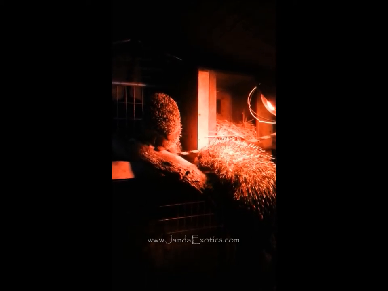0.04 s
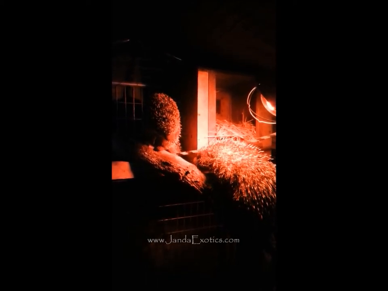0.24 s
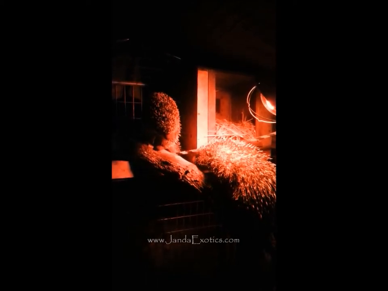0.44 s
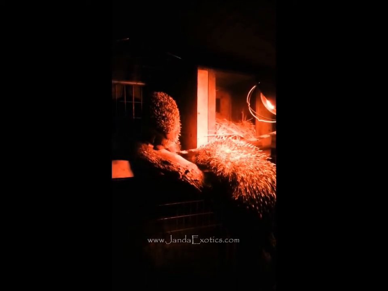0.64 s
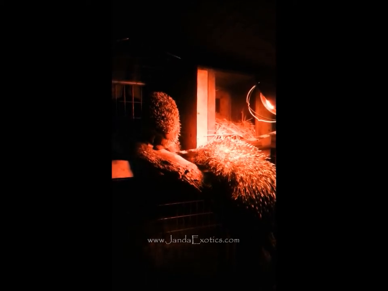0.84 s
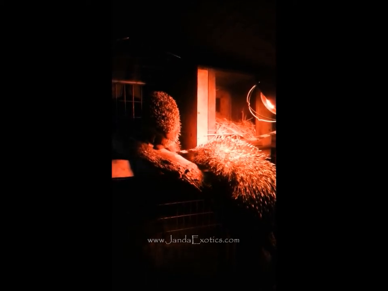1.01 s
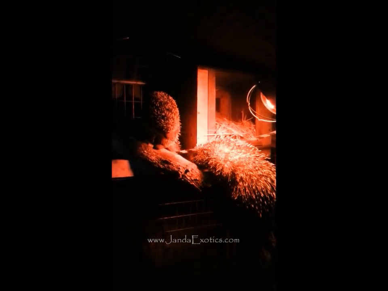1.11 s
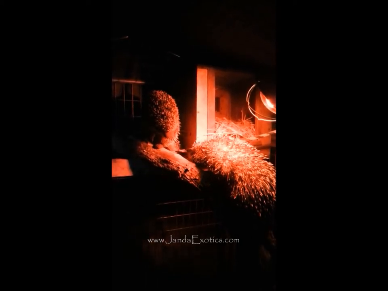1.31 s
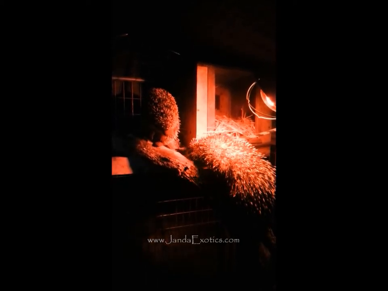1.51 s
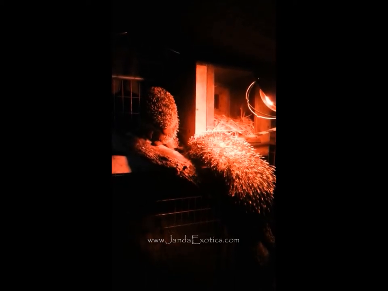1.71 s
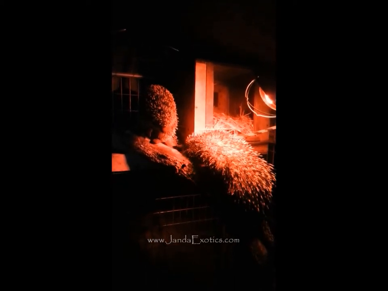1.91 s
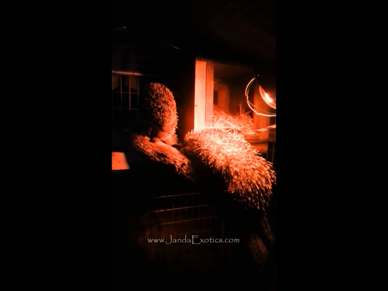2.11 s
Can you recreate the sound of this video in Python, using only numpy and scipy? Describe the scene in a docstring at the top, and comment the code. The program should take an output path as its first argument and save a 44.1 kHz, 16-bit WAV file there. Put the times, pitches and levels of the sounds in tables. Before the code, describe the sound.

A porcupine lets out two very short, harsh shrieks, then a whimpering growl and hissing snarl. After a pause comes a falling squawk and a low grunt. Quills and bedding rustle faintly, close up in a small wooden enclosure.

```python
"""Porcupine protesting in a wooden enclosure

Close up, on a stereo pair: two harsh shrieks, a whimpering growl, a hissing snarl, a falling squawk
and low grunts. Each is a train of uneven throat pulses ringing the mouth's resonances, with air
hissing past the teeth; the whimper is a thin wavering tone. Quills and bedding rustle and tick over
a faint low rumble, and the boards of the small enclosure throw everything back."""
import sys
import numpy as np
from scipy import signal
from scipy.fft import rfft, irfft
from scipy.io import wavfile
from scipy.ndimage import uniform_filter1d, minimum_filter1d

SR = 44100
rng = np.random.default_rng(int(sys.argv[2]) if len(sys.argv) > 2 else 0)


def put_to_file(sound):
    """Save the sound as 16-bit audio at rate SR, in the file named by the first command-line argument."""
    columns = np.atleast_2d(sound).T  # one column per channel
    safe = np.clip(columns, -1, 1)
    whole_steps = np.round(safe * 32767)
    wavfile.write(sys.argv[1], SR, whole_steps.astype(np.int16))


N = 94815
TIME = np.arange(N) / SR
FFT_SIZE = 2 ** 17
HZ = np.maximum(np.arange(FFT_SIZE // 2 + 1) * SR / FFT_SIZE, 1)
ALIKE = 1 / (1 + (HZ / 380) ** 2)   # share of diffuse power common to both microphones: the bass


def from_db(db):
    """Decibels to gain."""
    return 10 ** (np.asarray(db) / 20)


def rms_one(x):
    """Scale to unit power."""
    return x / np.sqrt(np.mean(x ** 2) + 1e-20)


def colour(points):
    """Gain at each frequency from (Hz, dB) points."""
    hz, db = np.transpose(points)
    return from_db(np.interp(np.log(HZ), np.log(hz), db))


def resonances(rows, skirt=1.189):
    """Unit-power gain curve of (centre Hz, width Hz, relative dB) peaks; skirt steepens their flanks."""
    return rms_one(sum(from_db(db) / (1 + (2 * (HZ - hz) / width) ** 2) ** skirt
                       for hz, width, db in rows))


def filtered(x, gain):
    """Causal (minimum-phase) filter with the given gains."""
    cepstrum = irfft(np.log(gain + 1e-9))
    cepstrum[1:FFT_SIZE // 2] *= 2
    cepstrum[FFT_SIZE // 2 + 1:] = 0
    return irfft(rfft(x, FFT_SIZE) * np.exp(rfft(cepstrum, FFT_SIZE)))[..., :N]


def in_time(rows):
    """A gate over the rows' span, then each column after the time at every sample."""
    times, *columns = np.transpose(rows)
    gate = uniform_filter1d(((TIME >= times[0]) & (TIME <= times[-1])) * 1., size=40)
    return [gate] + [np.interp(TIME, times, column) for column in columns]


def background(floor_db=-67, hum_hz=125, hum_db=-71.5):
    """Low rumble, alike at both microphones, with thin hiss and a faint hum."""
    # Room tone. Each row: frequency in Hz, relative level in dB.
    room_tone = [(25, -15), (60, -4), (115, 0), (170, -6), (300, -4.5), (600, -13.5), (3300, -30.5),
                 (7500, -30.5), (14500, -25.5)]
    gain = rms_one(colour(room_tone))
    common = filtered(rng.standard_normal(N), gain * np.sqrt(ALIKE))
    apart = filtered(rng.standard_normal((2, N)), gain * np.sqrt(1 - ALIKE))
    hum = rms_one(np.sin(2 * np.pi * hum_hz * TIME))
    return from_db(floor_db) * (common + apart) + from_db(hum_db) * hum


def enclosure(x, tail_delay_s=0.0042, early_decay_s=0.0028, early_db=-0.5):
    """Close reflections off the boards, then a short tail that lasts longest in the bass."""
    # Bands of the tail. Each row: centre in Hz, reverberation time in seconds, level in dB.
    bands = [(80.2, 0.5, 1.5), (231.2, 0.45, -1), (810, 0.27, -9), (2100, 0.28, -4.5), (3160, 0.18, -8),
             (6950, 0.22, -7.5), (12930, 0.31, -2)]
    common = np.sqrt(ALIKE) * rfft(rng.standard_normal(FFT_SIZE))
    apart = np.sqrt(1 - ALIKE) * rfft(rng.standard_normal((2, FFT_SIZE)))
    log_centres = np.log([row[0] for row in bands])
    tail = 0
    for (_, t60, db), this_band in zip(bands, np.eye(len(bands))):
        noise = irfft((common + apart) * np.interp(np.log(HZ), log_centres, this_band))[:, :N]
        decay = from_db(-60 * TIME / t60) * (TIME > tail_delay_s)
        tail = tail + noise * from_db(db) * rms_one(decay)
    early = rng.standard_normal((2, N)) * rms_one(np.exp(-np.minimum(TIME / early_decay_s, 50)))
    response = (tail + from_db(early_db) * early) / np.sqrt(N)
    return signal.fftconvolve(x, response, axes=1)[:, :N]


def scattered(x, delays, feedback=.5):
    """Nearby boards smear each pulse over a few milliseconds (a chain of all-pass echoes)."""
    spectrum = rfft(x, FFT_SIZE)
    for delay in delays:
        echo = np.exp(-2j * np.pi * HZ * delay)
        spectrum = spectrum * (echo - feedback) / (1 - feedback * echo)
    return irfft(spectrum)[:N]


def at_microphones(x, lean):
    """The voice favours the left microphone, except around 7-9 kHz; a lean of 0 centres it."""
    # Balance at a lean of 1. Each row: frequency in Hz, left minus right in dB.
    balance = [(100, 3), (700, 4.5), (1400, 7.5), (2500, 5), (4000, 21.5), (5400, 8.5), (6900, -13.5),
               (9000, -9), (14000, 7.5)]
    # Echoes off the boards, left then right. Each row: two delays in seconds.
    board_delays = [(.00017, .00061), (.00021, .00054)]
    ratio = colour(balance) ** lean
    right = np.sqrt(2 / (1 + ratio ** 2))
    return np.array([scattered(filtered(x, gain), delays)
                     for gain, delays in zip((ratio * right, right), board_delays)])


def rustle(crackles_per_s=2100, crackle_db=-14):
    """Quills brush the bedding: soft friction with tiny crackles."""
    # The animal's stirring. Each row: time in seconds, level in dB.
    stirring = [(0, -50), (.03, -54.5), (.08, -68), (.16, -78), (.47, -66), (.56, -70), (.61, -51),
                (.72, -46.5), (.77, -59.5), (.93, -51.5), (1.0, -84), (1.27, -70), (1.45, -80),
                (1.74, -75.5), (1.8, -59.5), (1.96, -52.5), (2.02, -72.5), (2.15, -65)]
    # Tone of the bedding. Each row: frequency in Hz, relative level in dB.
    bedding = [(100, -2), (500, 3.5), (1000, -1.5), (2200, 1), (3200, 0.5), (5500, 1.5), (7500, 0.5),
               (10000, -2.5), (14500, -15.5)]
    _, db = in_time(stirring)
    crackles = (rng.random((2, N)) < crackles_per_s / SR) * rng.standard_normal((2, N))
    friction = rms_one(rng.standard_normal((2, N)) + from_db(crackle_db) * rms_one(crackles))
    return filtered(friction * from_db(db), rms_one(colour(bedding)))


def ticks(rise_s=0.002, decay_s=0.005, width_hz=4300):
    """Quills and claws make brief bright scratches, each with a slight knock on the boards."""
    # Each row: peak time in seconds, level in dB, brightest frequency in Hz, knock gain in dB.
    scratches = [(0.106, -57.5, 7600, -28), (1.288, -52, 7500, -4.5), (1.297, -50, 7600, 2),
                 (1.379, -56, 5800, -21), (1.525, -59.5, 8000, -5), (1.789, -48, 9100, -10),
                 (2.106, -47, 6700, -20)]
    # Tone of the knock. Each row: frequency in Hz, relative level in dB.
    knock = [(40, -2.5), (95, 23), (300, 9), (520, 18.5), (900, 1.5), (5000, 1), (11000, -6.5),
             (15000, -12)]
    out = np.zeros((2, N))
    for peak_s, db, hz, knock_db in scratches:
        envelope = np.exp(-np.maximum((peak_s - TIME) / rise_s, (TIME - peak_s) / decay_s).clip(0, 50))
        gain = resonances([(hz, width_hz, 0)]) + from_db(knock_db) * colour(knock)
        out += filtered(from_db(db) * envelope * rng.standard_normal((2, N)), gain)
    return out


def hiss(rows, rush_db, whistle_db, whistle_width_hz=500):
    """Air rushes through the mouth and excites a gliding whistle-like resonance at the teeth."""
    # Mouth resonances. Each row: centre in Hz, width in Hz, relative level in dB.
    mouth = [(3750, 820, -9.5), (5380, 980, -2.5), (6740, 2700, -8.5)]
    gate, db, hz = in_time(rows)
    rush = filtered(rng.standard_normal(N), resonances(mouth))
    pole = np.exp(-2 * np.pi * whistle_width_hz / SR)
    carrier = np.exp(2j * np.pi * np.cumsum(hz) / SR)
    slow_noise = signal.lfilter([1], np.poly([pole, pole]), rng.standard_normal(N) / carrier)
    whistle = rms_one((slow_noise * carrier).real)
    return gate * from_db(db) * (from_db(rush_db) * rush + from_db(whistle_db) * whistle)


def breaths():
    """Three hisses: with the second shriek, with the snarl and trailing the squawk."""
    # Each row: time in seconds, level in dB before the rush and whistle gains, whistle pitch in Hz.
    shriek_air = [(.575, -56, 6130), (.61, -47, 7194), (.68, -42.5, 5360), (.735, -39.5, 7160),
                  (.755, -60.5, 7200)]
    snarl_air = [(.81, -50, 6400), (.826, -38, 6360), (.85, -40, 6960), (.885, -46.5, 7140),
                 (.91, -53, 7100), (.945, -60, 8200), (.975, -87, 8610)]
    squawk_air = [(1.72, -48, 7000), (1.785, -44.5, 6860), (1.81, -52.5, 6730), (1.89, -49.5, 6600),
                  (1.912, -49, 6800), (1.972, -47.5, 7000), (2.01, -87, 7240)]
    return (hiss(shriek_air, rush_db=0.5, whistle_db=-5.5)
            + hiss(snarl_air, rush_db=-8, whistle_db=-1)
            + hiss(squawk_air, rush_db=0, whistle_db=-2.5))


def throat(start_s, end_s, pitch, rough):
    """Pulses with puffs of air; roughness makes them uneven, strong and weak by turns, and airier."""
    jitter, shimmer_db, limp, rough_air = 0.13, 1.5, 0.29, 0.97   # at full roughness
    leak = .14   # air even in the clearest voice
    pulses, puffs = np.zeros(N), np.zeros(N)
    now = start_s
    for k, (timing_draw, strength_draw) in enumerate(rng.standard_normal((400, 2))):
        if now >= end_s:
            break
        i = int(now * SR)
        period = np.exp(jitter * rough[i] * timing_draw) / pitch[i]
        alternation = 1 + limp * rough[i] * (-1) ** k / 2
        strength = from_db(shimmer_db * rough[i] * strength_draw) * alternation
        length = int(period * SR)
        pulses[i] = strength * np.sqrt(length)
        puffs[i:i + length] = strength * rms_one(np.exp(-1.5 * np.arange(length) / length))
        now += period
    air = np.clip(leak + rough_air * rough, 0, 1)
    source = np.sqrt(1 - air ** 2) * pulses + air * puffs * rng.standard_normal(N)
    local_power = np.maximum(uniform_filter1d(puffs ** 2, size=600), .1)
    return source / np.sqrt(local_power)


def call(contour, mouth, chest_db, chest_follows=0.31):
    """Throat pulses ring the mouth; the chest rumbles along, following part of the swing in dB."""
    # Tone of the chest. Each row: frequency in Hz, relative level in dB.
    chest_tone = [(30, -24), (80, 1.5), (130, -4.5), (220, -3.5), (400, -13), (700, -25), (3000, -59.5)]
    gate, pitch, db, rough = in_time(contour)
    source = throat(contour[0][0], contour[-1][0], pitch, rough) * gate * from_db(db)
    rumble = gate * from_db(chest_db + chest_follows * db) * rng.standard_normal(N)
    return filtered(source, resonances(mouth)) + filtered(rumble, rms_one(colour(chest_tone)))


def grunts():
    """Slow, soft throat pulses: one low grunt at the start and one after the squawk."""
    # One list a grunt. Each row: time in seconds, pitch in Hz, level in dB, roughness from 0 to 1.
    contours = [
        [(0, 166.2, -49, 0.34), (.025, 167, -50, 0.55), (.06, 154.3, -70, 0.54)],
        [(1.815, 176, -56, 0.51), (1.84, 184.8, -43, .1), (1.865, 185.9, -37.5, 0.11),
         (1.89, 168.7, -48.5, 0.55), (1.935, 133.3, -58, .9), (1.97, 153, -49.5, 0.84), (2.0, 130, -74, 0.59)],
    ]
    # Mouth resonances. Each row: centre in Hz, width in Hz, relative level in dB.
    mouth = [(170, 130, -5), (730, 220, -10), (1350, 350, -8), (2400, 700, -16), (3530, 280, 0),
             (3930, 420, 1), (5230, 450, -3.5), (7397, 600, -8)]
    return sum(call(contour, mouth, chest_db=-43) for contour in contours)


def whimper(waver_depth=.025):
    """A thin, nearly pure note that wavers above the growl."""
    # Each row: time in seconds, pitch in Hz, level in dB.
    contour = [(.736, 790, -53), (.748, 770, -45), (.775, 745, -47.5), (.79, 780, -44), (.808, 745, -50)]
    gate, hz, db = in_time(contour)
    waver = rms_one(uniform_filter1d(rng.standard_normal(N), size=120))
    phase = 2 * np.pi * np.cumsum(hz * (1 + waver_depth * waver)) / SR
    return gate * from_db(db) * rms_one(np.sin(phase))


def growl():
    """A short, half-rough pulse train holding near 250 Hz."""
    # Each row: time in seconds, pitch in Hz, level in dB, roughness from 0 to 1.
    contour = [(.742, 250, -48, .4), (.758, 252, -39.5, .35), (.792, 256, -34.5, .45), (.812, 245, -42, .6)]
    # Mouth resonances. Each row: centre in Hz, width in Hz, relative level in dB.
    mouth = [(1390, 1800, -1), (3550, 350, 12.5), (3960, 200, 18), (4970, 1100, -1), (7300, 930, -6)]
    return call(contour, mouth, chest_db=-43.5)


def snarl():
    """Low, rough pulses that slow as they fade."""
    # Each row: time in seconds, pitch in Hz, level in dB, roughness from 0 to 1.
    contour = [(.805, 200.8, -39.5, 0.85), (.83, 188.5, -37, 0.54), (.865, 174.5, -46.5, 0.32),
               (.93, 174.8, -47.5, 0.52), (.968, 146.8, -64, 0.45)]
    # Mouth resonances. Each row: centre in Hz, width in Hz, relative level in dB.
    mouth = [(190, 180, -13), (570, 400, -7), (1450, 700, -15), (2130, 990, -12.5), (3510, 230, 4),
             (3940, 380, 3), (5270, 530, -4)]
    return call(contour, mouth, chest_db=-49.5)


def squawk():
    """A clear note that falls and breaks into a rasp as the pulses turn uneven."""
    # Each row: time in seconds, pitch in Hz, level in dB, roughness from 0 to 1.
    contour = [(1.670, 415, -38, .25), (1.674, 420, -26, .2), (1.681, 405, -26, .08),
               (1.697, 404, -22.5, .05), (1.706, 390, -22, .07), (1.714, 366, -25.5, .13),
               (1.723, 340, -28, .42), (1.737, 305, -30, .55), (1.748, 237, -39, .75), (1.79, 182, -60, 1)]
    # Mouth resonances. Each row: centre in Hz, width in Hz, relative level in dB.
    mouth = [(380, 280, -32), (756, 460, -15.5), (1417, 250, -10.5), (2500, 1300, -17), (3490, 273, 2.5),
             (3920, 500, 2), (4410, 400, -17.5), (5270, 350, -5), (6900, 600, -14)]
    return call(contour, mouth, chest_db=-46)


def shrieks():
    """Two loud bursts of rough, airy pulses, plunging in pitch and ringing the mouth at 3-4 kHz."""
    # Each row: time in seconds, pitch in Hz, level in dB, roughness from 0 to 1.
    first = [(.2385, 448, -31.5, 0.92), (.2405, 427.8, -1, 0.88), (.247, 401, -12.5, 0.76),
             (.259, 325.9, -10.5, 0.9), (.265, 283, -6, 0.9), (.272, 247.7, -12.5, 0.64),
             (.279, 211, -40, 0.3)]
    second = [(.623, 399.4, -44.5, 0.88), (.627, 399, -19.5, 0.97), (.635, 340.7, -5.5, 0.51),
              (.643, 326, -13, 0.43), (.650, 239.3, -16.5, 0.89), (.662, 226.5, -42.5, 0.63),
              (.69, 228, -41, 0.6), (.735, 247, -51, 0.41)]
    # Mouth resonances. Each row: centre in Hz, width in Hz, relative level in dB.
    first_mouth = [(800, 450, -17.5), (1500, 720, -16), (3350, 500, 4.5), (3820, 600, 6.5),
                   (5320, 800, 1.5), (7095, 1710, -4.5), (9090, 500, -23)]
    second_mouth = [(690, 160, -18.5), (1320, 450, -15), (2100, 600, -21.5), (3200, 450, 2),
                    (3900, 600, -.5), (4700, 750, -2.5), (6450, 1700, -7.5), (10000, 2000, -32)]
    return call(first, first_mouth, chest_db=-44) + call(second, second_mouth, chest_db=-47.5)


def scene():
    """Voice and movements close to the microphones, with their reflections, over the room tone."""
    voice = shrieks() + growl() + whimper() + snarl() + squawk() + grunts() + breaths()
    movement = rustle() + ticks()
    direct = at_microphones(voice, lean=1) + movement
    reflected = enclosure(at_microphones(voice, lean=0.38) + movement)
    return direct + reflected + background()


def record(dry, ceiling=.75, limiter_s=.004, cutoff_hz=15000):
    """A fast limiter holds the loudest peaks; a steep low-pass cuts the top."""
    window = int(limiter_s * SR)
    allowed = ceiling / np.maximum(np.abs(dry).max(axis=0), ceiling)
    gain = uniform_filter1d(minimum_filter1d(allowed, size=window), size=window)
    low_pass = signal.ellip(12, .1, 80, cutoff_hz, fs=SR, output="sos")
    return signal.sosfilt(low_pass, dry * gain)


dry = scene()
out = record(dry)
put_to_file(out)
```